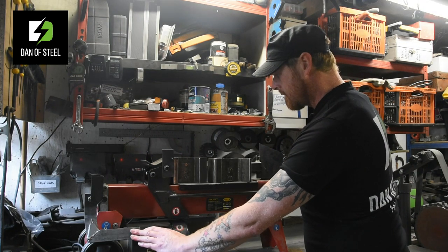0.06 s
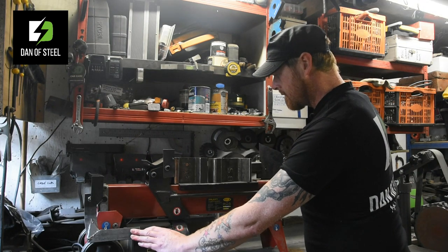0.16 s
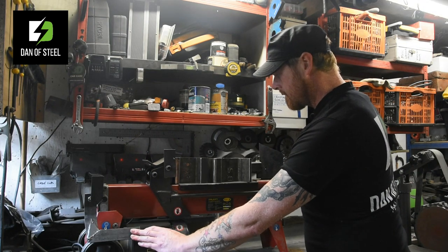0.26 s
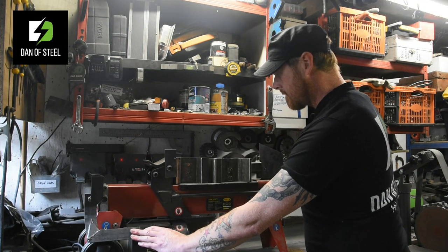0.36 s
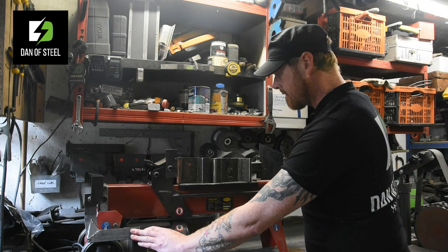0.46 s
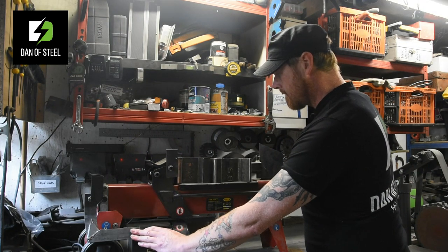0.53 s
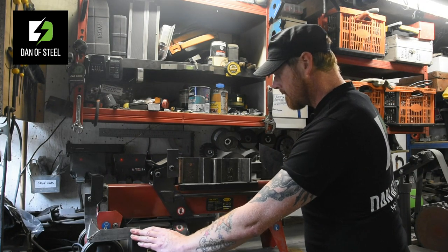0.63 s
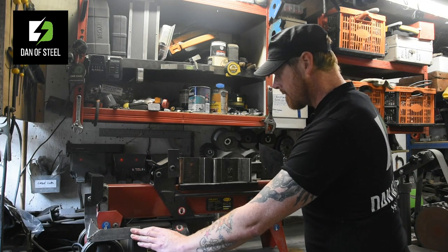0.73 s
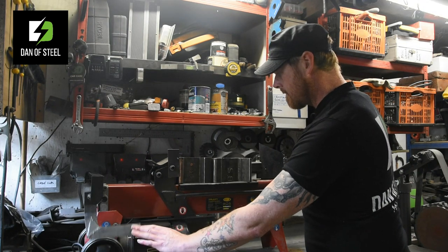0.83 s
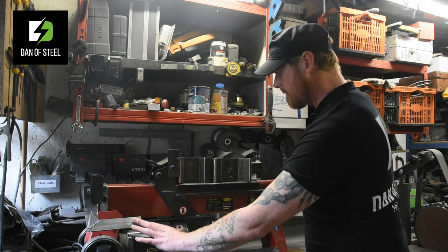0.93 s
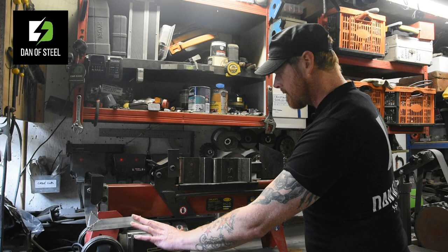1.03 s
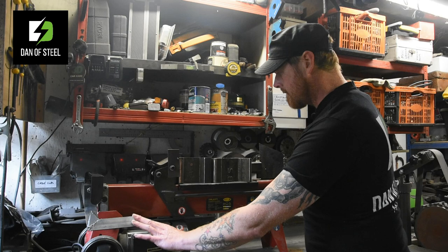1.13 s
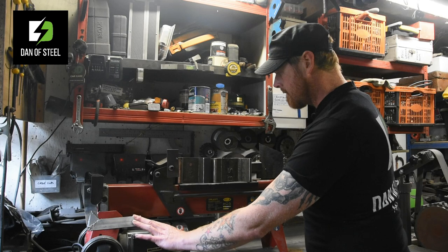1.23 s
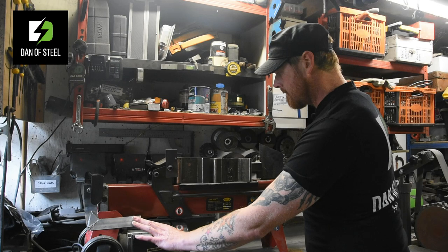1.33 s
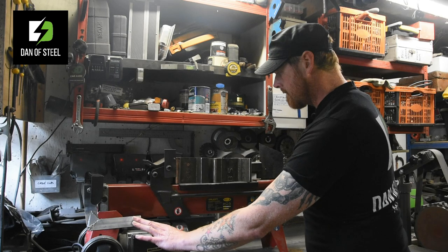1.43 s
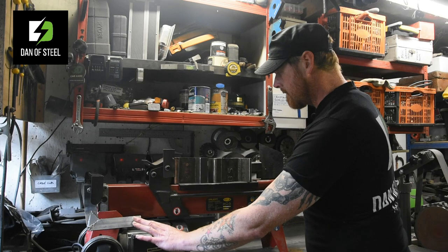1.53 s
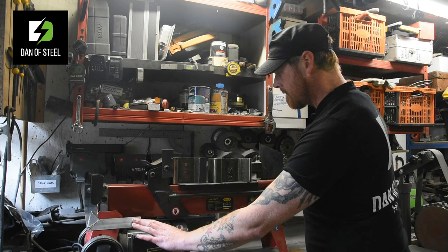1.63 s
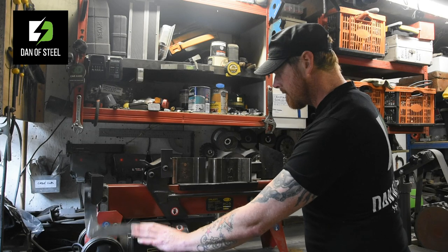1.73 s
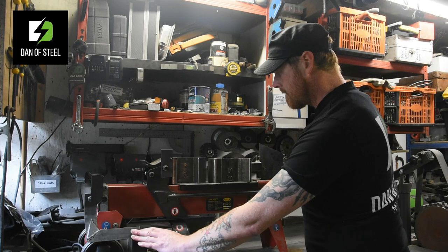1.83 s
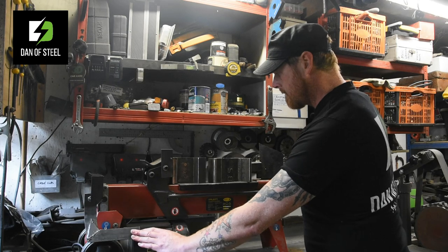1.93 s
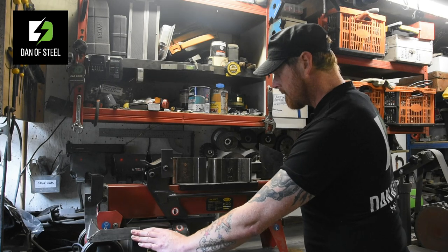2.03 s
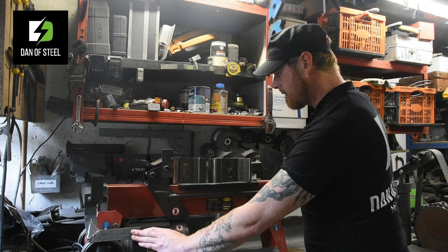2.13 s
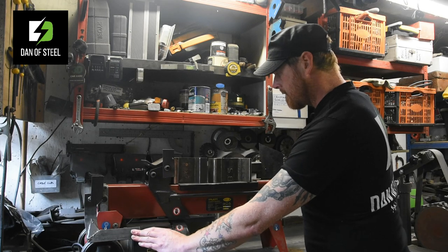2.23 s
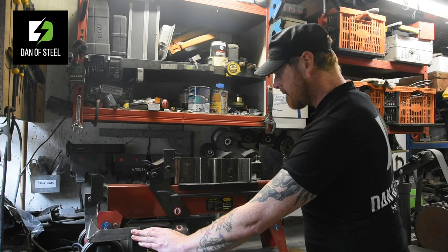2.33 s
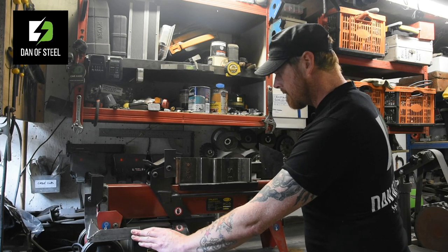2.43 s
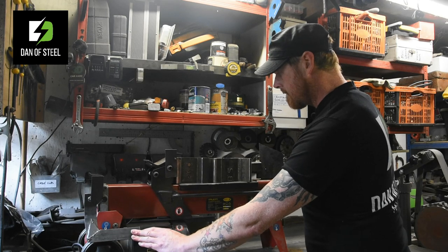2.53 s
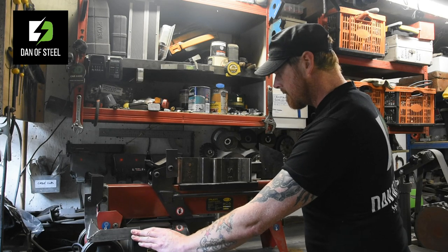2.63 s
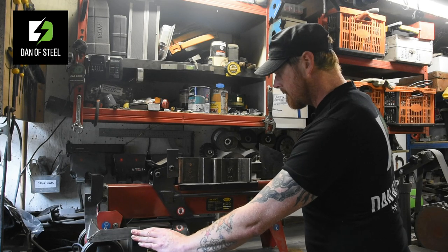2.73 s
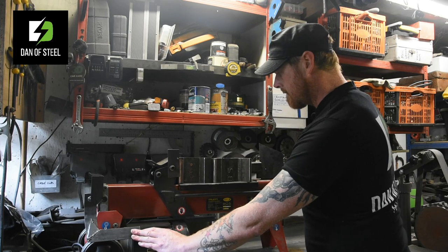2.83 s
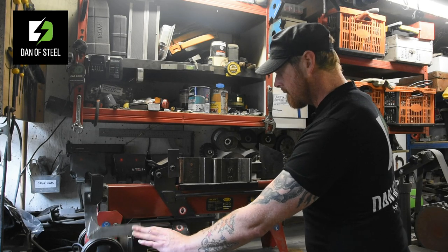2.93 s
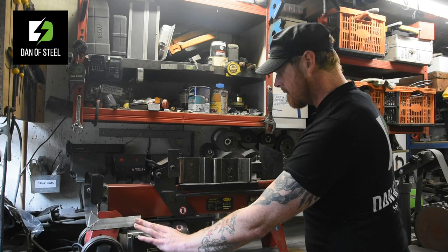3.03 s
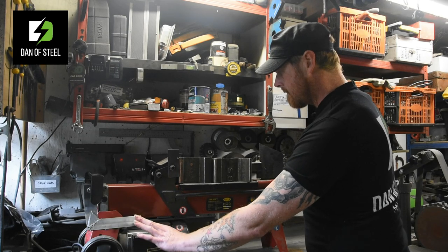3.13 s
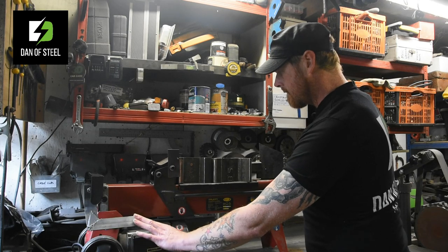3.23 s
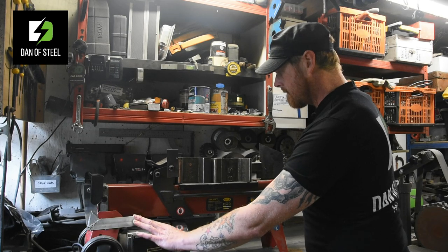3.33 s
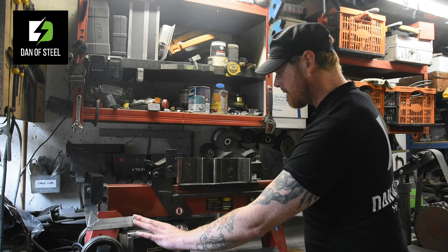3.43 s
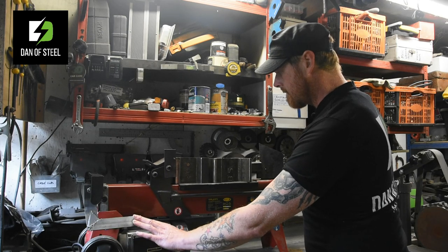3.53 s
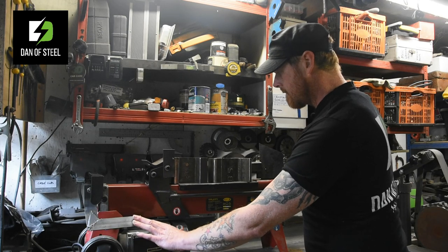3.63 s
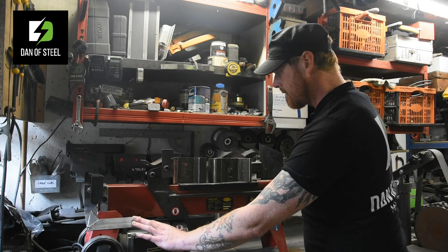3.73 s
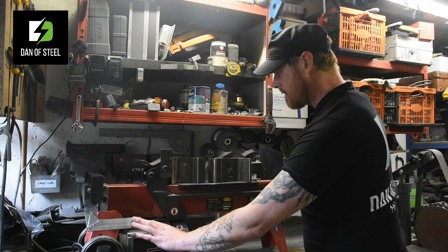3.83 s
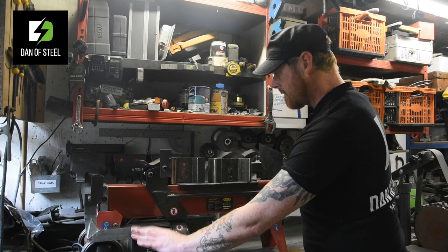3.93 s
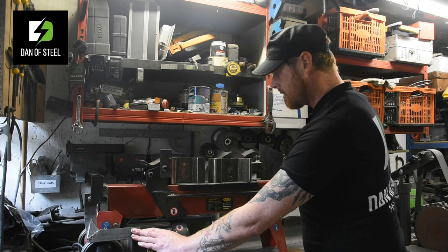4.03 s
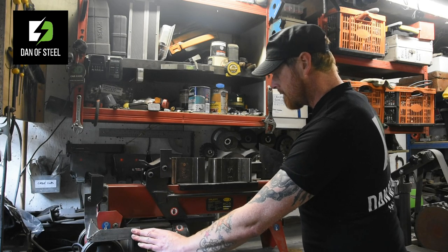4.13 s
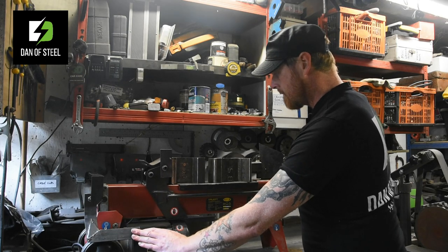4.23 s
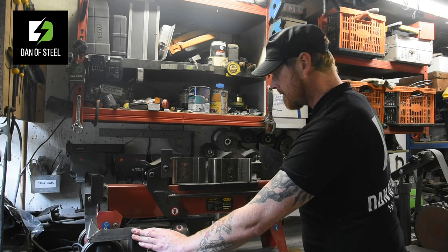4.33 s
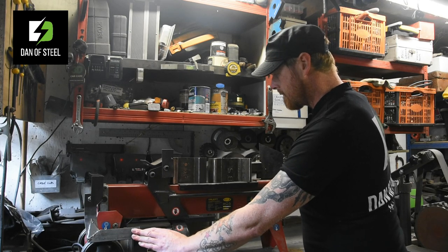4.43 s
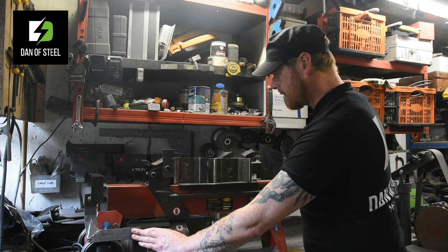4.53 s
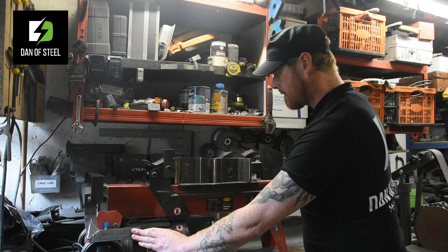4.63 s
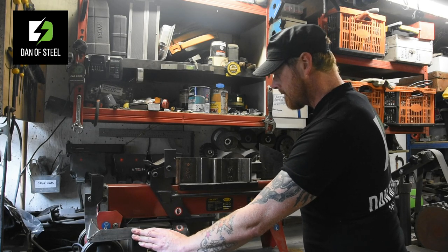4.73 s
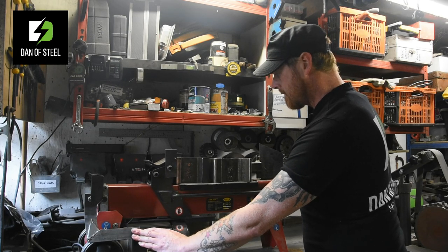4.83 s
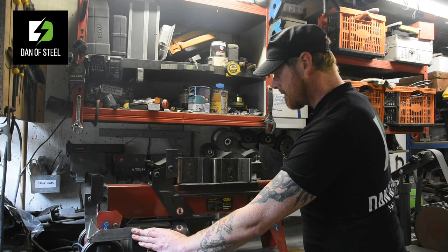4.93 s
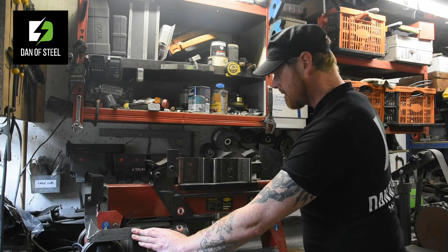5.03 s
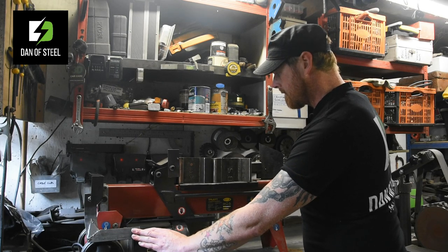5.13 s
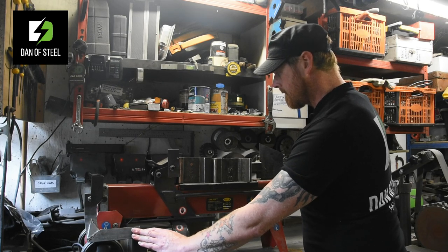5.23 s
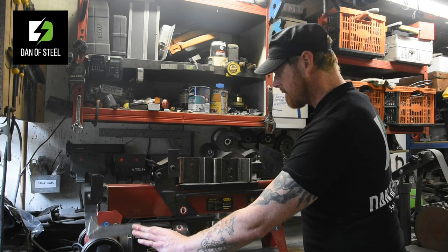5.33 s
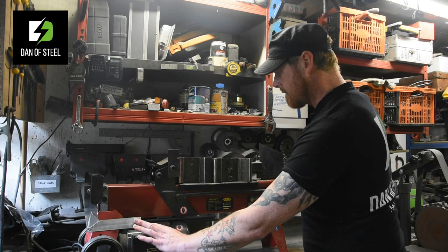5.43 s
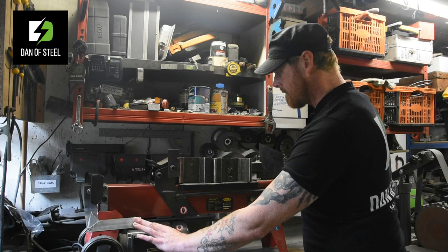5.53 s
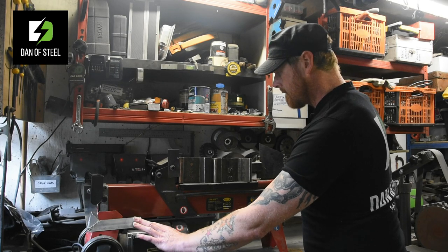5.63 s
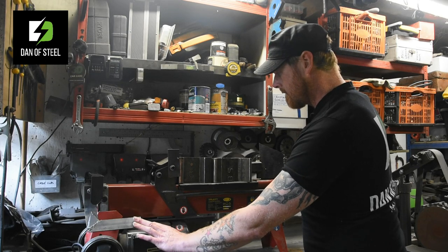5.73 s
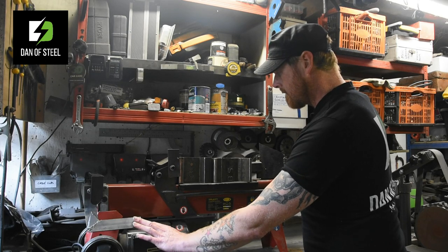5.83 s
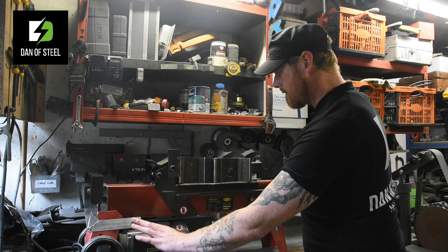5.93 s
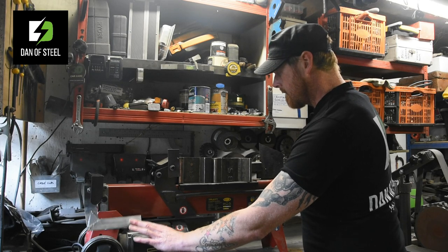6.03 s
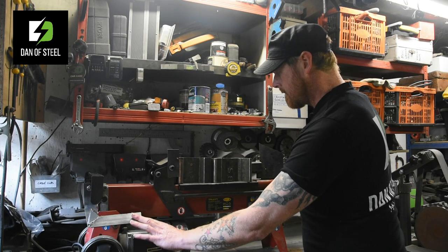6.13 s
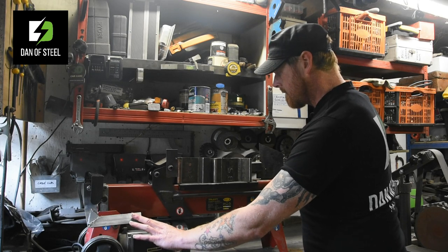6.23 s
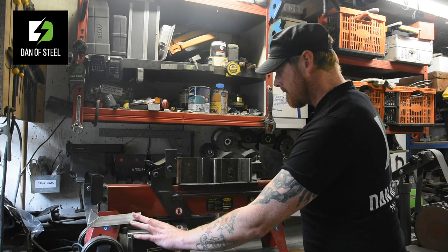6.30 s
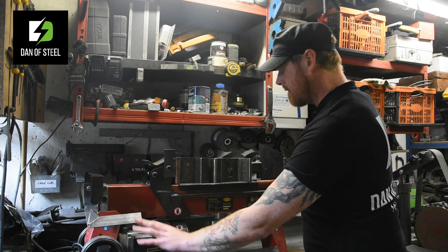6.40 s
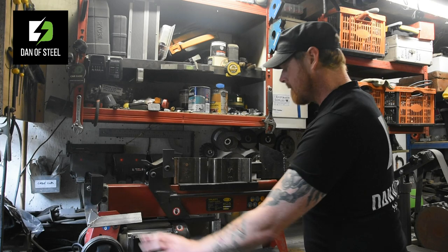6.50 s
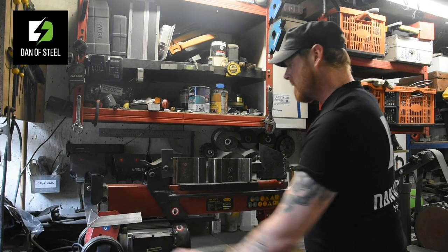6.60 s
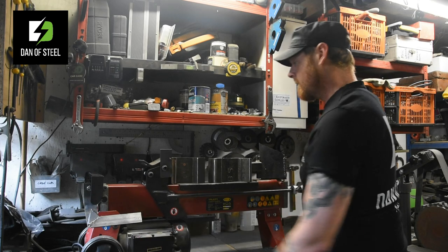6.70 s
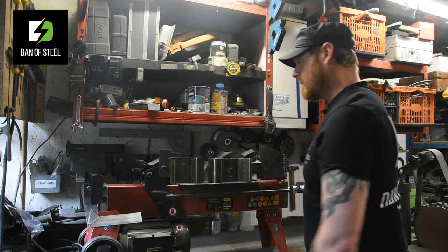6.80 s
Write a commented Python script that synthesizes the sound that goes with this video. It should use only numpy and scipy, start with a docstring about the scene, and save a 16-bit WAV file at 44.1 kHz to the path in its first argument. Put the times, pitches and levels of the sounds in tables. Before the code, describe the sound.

A close view of an electric hydraulic machine in a crowded workshop. It is already starting at 0 s: rapid steel knocks, a buzzing motor and a rough growl, then a loud gear whine with oil hiss and frame rattle, tightening under load until a knock at 0.8 s. Power drops at 0.9; the rotor brakes quickly and whirrs down, a rough bearing brushing once per turn over softly hissing return oil. Knocks and clicks come near 1.2, a squealing steel scrape at 1.85. The second run starts with knocks at 2.07, unloads at 2.9 and coasts, with a knock at 3.3 and a scrape at 4.0. The third runs from 4.26 to 5.4, with a knock at 5.2, then a longer slowing, ticking coast. At 6.1 a lever snaps back with a bright ringing crack and tiny squeaks; soft thuds, faint scrapes and clicks follow until about 6.75 as the whirr dies. Shelves return a short echo.

```python
"""Electric log splitter in a workshop

An induction motor runs an eleven-tooth gear pump three times, with tones locked to shaft and teeth.
Filtered noise gives the oil's hiss and the rattle; each run ends in a coast with a ticking bearing.
Decaying modes make the knocks of the steel frame and the lever snapping back near the end.
Sliding steel scrapes and squeals, and crowded shelves return a short echo of the blows."""
import sys
import numpy as np
from scipy import signal
from scipy.fft import rfft, irfft
from scipy.io import wavfile
from scipy.ndimage import uniform_filter1d

SR = 44100
rng = np.random.default_rng(int(sys.argv[2]) if len(sys.argv) > 2 else 0)


def wav_record(signal):
    """Record a signal, one row per channel, as 16-bit PCM in the file named by sys.argv[1]."""
    frames = np.transpose(np.atleast_2d(signal))
    bounded = np.clip(frames, -1, 1)
    # unit amplitude maps onto the largest positive 16-bit level
    quanta = np.round(bounded * 32767).astype(np.int16)
    wavfile.write(sys.argv[1], SR, quanta)


N = 302526
T = np.arange(N) / SR  # time [s]

# runs: (power on [s], pressure lets go [s], power off [s], return flow ends [s], shaft comes to rest [s],
#        hiss [dB], whine [dB], tooth ring [dB], start [dB], rattle [dB]), levels as offsets
RUNS = [(-.018, 0.798, 0.9, 1.73, 1.95, 0.8, 0.5, 2.5, 2.5, 1),
        (2.066, 2.918, 2.995, 3.88, 4.1, -2.1, 0.5, 0.5, -3, -1),
        (4.257, 5.215, 5.385, 5.45, 6.86, -0.7, 0.05, -0.5, -0.5, 0.5)]
# modes of the steel frame: (frequency [Hz], relative level [dB], t60 [s])
FRAME_MODES = [(503, -11, 0.21), (665, -1.5, 0.18), (774, 1.5, 0.29), (1140, -2.5, 0.34), (1306, 7, 0.12),
               (1470, 6, 0.11), (1580, -3, 0.067), (2034, 15.5, 0.038), (2100, -6, 0.066), (2814, -5, .06),
               (3174, 1.5, 0.077)]
TEETH, MAINS_HZ = 11, 50
# after power on the pump draws oil at PRIME_S; after power off it delivers until SPILL_S
PRIME_S, SPILL_S = 0.11, 0.066


def undb(db):
    """Level in decibels to amplitude ratio."""
    return 10 ** (np.asarray(db) / 20)


def unit(x):
    """Normalisation to an rms of 1."""
    return x / np.sqrt(np.mean(x ** 2))


def noise():
    """White noise: equal power density at all frequencies."""
    return rng.standard_normal(N)


def walk(rate):
    """Smoothed random steps, rate per second: a drift of rms 1."""
    step = int(SR / rate)
    steps = np.repeat(rng.standard_normal(N // step + 1), step)
    return unit(uniform_filter1d(steps, step)[:N])


def colour(x, points, peaks=()):
    """Minimum-phase filter of unit energy through (Hz, dB) points, plus (Hz, width Hz, dB) resonances."""
    size = 2 ** 12
    f = np.maximum(np.arange(size // 2 + 1) * SR / size, 1)
    hz, level = np.transpose(points)
    level = np.interp(np.log(f), np.log(hz), level)
    for centre, width, gain_db in peaks:
        level = level + gain_db / (1 + (2 * (f - centre) / width) ** 2)
    # folding the cepstrum onto positive time makes the response causal
    cepstrum = irfft(np.log(undb(level)))[:size // 2]
    cepstrum[1:] *= 2
    response = irfft(np.exp(rfft(cepstrum, size)))
    return signal.fftconvolve(x, response / np.linalg.norm(response))[:N]


def envelope(start, end, attack_s, release_s):
    """First-order charge and discharge: exponential approach from start, exponential release after end."""
    attack = 1 - np.exp(-np.maximum(T - start, 0) / attack_s)
    return attack * np.exp(-np.maximum(T - end, 0) / release_s)


def decay(s, t60):
    """Exponential damping after a jump at s, falling 60 dB in t60."""
    return (T >= s) * np.exp(-np.log(1000) * np.clip((T - s) / t60, 0, 2))


def impulses(rows):
    """Ideal impact: a force one sample long for each (s, dB) blow."""
    return sum(undb(db) * np.diff(T >= s, prepend=0) for s, db, *_ in rows)


def bursts(rows):
    """Random micro-impacts: a decaying shower of noise for each (s, dB, t60) blow."""
    return noise() * sum(undb(db) * decay(s, t60) for s, db, t60 in rows)


def ring(modes):
    """Modal superposition: impulse response of slightly mistuned damped modes, of unit energy."""
    t = T[:SR // 2]
    response = 0
    for hz, db, t60 in modes:
        mistuning = 1 + .002 * rng.standard_normal()
        response = response + undb(db - 60 * t / t60) * np.sin(2 * np.pi * hz * t * mistuning)
    return response / np.linalg.norm(response)


def tones(turns, orders, waver_db):
    """Order locking: sines at multiples of a rotation, each wavering in level."""
    total = 0
    for order, db in orders:
        level = undb(db + waver_db * walk(14))
        total = total + level * np.sin(2 * np.pi * (order * turns + rng.random()))
    return total


def surface(turns, locked, count):
    """Cyclic roughness that recurs every turn (power share locked), mixed with fresh turbulence."""
    bumps = np.interp(turns % 1 * count, np.arange(count), rng.standard_normal(count))
    return np.sqrt(locked) * unit(bumps) + np.sqrt(1 - locked) * noise()


def shaft_speed():
    """Rotor dynamics as a share of full speed: the motor spins up, oil brakes it at power off, it coasts."""
    coast_share, coast_s = .596, .83  # share of speed left after braking, time constant of coasting
    spin_up_s, brake_s, rest_s = .06, .09, .07
    speed = 0
    for on, _, off, _, rest, *_ in RUNS:
        idle = np.maximum(T - off, 0)
        braked = coast_share + (1 - coast_share) * np.exp(-(idle / brake_s) ** 3)
        coasting = np.exp(-idle / coast_s - np.maximum(T - rest, 0) / rest_s)
        speed = speed + np.tanh(np.maximum(T - on, 0) / spin_up_s) * braked * coasting
    return speed


def pressure(on, release, bleed_s=.015):
    """Hydraulic load of one run: oil pressure builds quickly, creeps up to about 1, then lets go."""
    rise_s, creep_db_per_s = 0.15, 3.5
    creep = undb(creep_db_per_s * np.minimum(T - release, 0))
    return envelope(on + PRIME_S, release, rise_s, bleed_s) * creep


def tone_load():
    """Slow unloading: the pressure of all runs as the tones follow it, bled off over 0.1 s."""
    return sum(pressure(on, release, bleed_s=.1) for on, release, *_ in RUNS)


def return_flow():
    """Displaced oil flows back from the end of delivery until the ram is home."""
    return sum(envelope(off + SPILL_S, home, 0.018, 0.098) for _, _, off, home, *_ in RUNS)


def shelf_echo(impacts):
    """Diffuse reflection: crowded shelves answer the blows with a short decaying noise response."""
    points = [(100, 7.5), (1000, -7.0), (5000, -2.0), (16000, -16)]
    shelves = colour(noise() * decay(0.004, 0.35), points)[:SR // 2]
    return undb(-12.5) * signal.fftconvolve(impacts, shelves / np.linalg.norm(shelves))[:N]


def swell(s, spread):
    """Gaussian rise and fall of a contact about its moment s."""
    return np.exp(-.5 * ((T - s) / spread) ** 2)


def squeal(hz, width):
    """Friction tone: a sine of rms 0.7 times root 2, its frequency jittering by the share width."""
    return np.sqrt(2) * np.sin(2 * np.pi * np.cumsum(hz * (1 + width * walk(900))) / SR)


def friction():
    """Stick-slip: sliding steel rings the frame and squeals; the lever spring squeaks."""
    # sliding steel, and the handle rattling in the 5260 Hz and 8300 Hz rows: (centre [s], spread [s], level
    # [dB], squeal [Hz], squeal relative to grit [dB])
    scrapes = [(1.842, 0.032, -26.5, 1319, -5), (4.023, 0.027, -23.5, 1316, -10.5),
               (6.605, 0.038, -42, 1620, 1.5), (6.62, 0.044, -47, 5260, 4), (6.52, 0.064, -49, 8300, -2),
               (6.644, 0.076, -45.5, 3280, -4)]
    # squeaks of the lever spring: (centre [s], spread [s], level [dB], frequency [Hz])
    squeaks = [(6.134, 0.0093, -20, 8660), (6.174, 0.015, -29, 4780), (6.168, 0.0097, -30.5, 9550)]
    # colour of the scrape: (frequency [Hz], relative density [dB])
    scrape_colour = [(100, -36), (250, -9.5), (470, -1.5), (900, -2), (1330, 6), (1650, -13), (2150, -5.5),
                     (2900, -8), (3600, -20), (9800, -17.5), (13500, -26), (16000, -40)]
    slips = unit(noise() * undb(2 * walk(250)))
    grit = undb(-3) * colour(slips, scrape_colour)
    grit = grit + undb(-12.5) * signal.fftconvolve(slips, ring(FRAME_MODES))[:N]
    total = 0
    for s, spread, db, hz, relative_db in scrapes:
        slide = grit + undb(relative_db) * squeal(hz, 0.0218)
        total = total + undb(db) * swell(s, spread) * slide
    for s, spread, db, hz in squeaks:
        total = total + undb(db) * swell(s, spread) * squeal(hz, 0.04)
    return total


def lever(s):
    """Impact excitation: the lever hits its stop with a bright crack, rings its modes and clatters out."""
    # modes of the lever: (frequency [Hz], relative level [dB], t60 [s])
    lever_modes = [(642, 8, 0.19), (580, -3, 0.15), (780, -7, 0.24), (1173, -7, 0.3), (1270, -13, 0.11),
                   (5130, -18, 0.24), (8695, -12, .09), (9000, -12, .09), (9700, -7, .06), (9500, 7, .06)]
    # colour of the clatter: (frequency [Hz], relative density [dB])
    clatter_colour = [(29, -64), (50, -16), (96, -17), (160, -15.5), (240, -27), (340, -13.5), (532, -8.5),
                      (645, -19), (727, -12), (2100, -14.5), (3840, -28.5), (6860, -29), (8730, -32),
                      (11400, -40), (14800, -35), (16000, -46)]
    crack_colour = [(1000, -19), (7000, -2.5), (10100, 6.5), (12000, -5), (16000, -2)]
    crack = colour(bursts([(s, -4, .04)]), crack_colour, [(10277, 500, 7.3)])
    clatter = colour(bursts([(s, -11, .13)]), clatter_colour)
    return crack + clatter + signal.fftconvolve(impulses([(s, 15)]), ring(lever_modes))[:N]


def blows():
    """Modal response to impact: knocks ring the frame and loose parts, clicks stay bright, thuds rock the stand."""
    # knocks of the frame: (time [s], level [dB], t60 [s])
    knocks = [(.039, -3, 0.023), (.079, -10, 0.05), (.12, -9.5, .03), (.138, -6, 0.054), (.803, -4, 0.055),
              (.812, -14, .06), (.969, -19, 0.062), (1.197, -6.5, 0.076), (1.314, -29, 0.076),
              (2.001, -38, 0.15), (2.083, -4.5, 0.055), (2.1, -5, 0.049), (2.145, -10, 0.025),
              (2.918, -9, 0.069), (3.065, -15, 0.048), (3.295, -12.5, 0.067), (3.413, -31, 0.086),
              (4.277, -9.5, 0.075), (4.288, -2, 0.037), (4.325, -9, 0.03), (4.342, -12, 0.032),
              (5.219, -7, 0.075), (6.696, -30, 0.067)]
    # light metal clicks of valve and handle: (time [s], level [dB], t60 [s])
    clicks = [(.97, -20.5, 0.033), (1.178, -17.5, 0.12), (1.225, -22, 0.035), (1.314, -24.5, 0.053),
              (1.866, -30, .04), (3.282, -20.5, 0.16), (3.413, -24.5, .04), (4.057, -33, 0.032),
              (4.091, -28.5, 0.018), (6.259, -34, 0.055), (6.323, -33, 0.044), (6.556, -26.5, 0.07),
              (6.615, -37, 0.29), (6.696, -28, 0.028), (6.737, -36, 0.038)]
    # soft thuds as the machine settles: (time [s], level [dB])
    thuds = [(1.209, -39), (1.47, -36), (3.32, -34), (6.124, -36), (6.325, -34), (6.409, -30), (6.508, -31)]
    # colours of loose parts and of clicks: (frequency [Hz], relative density [dB])
    knock_colour = [(35, -71), (60, -59), (491, -9.5), (731, 1), (1410, 2), (2040, -12), (2400, -7.5),
                    (3040, -9.5), (3930, -27.5), (6120, -19.5), (7550, -47), (10700, -33), (16000, -51)]
    click_colour = [(300, 1), (1300, 5.5), (2500, 5.5), (4000, -3.5), (5500, 6), (7500, 0.5), (10000, 3),
                    (12500, -6.5), (16000, -25)]
    chatter = bursts(knocks)
    push = undb(16.5) * impulses(knocks) + undb(-9.5) * chatter
    frame = signal.fftconvolve(push, ring(FRAME_MODES))[:N]
    loose_parts = undb(-1.5) * colour(chatter, knock_colour)
    bright = colour(bursts(clicks), click_colour)
    stand_modes = [(117.4, -4, 0.26), (154, -2, 0.069)]
    stand = undb(20.5) * signal.fftconvolve(impulses(thuds), ring(stand_modes))[:N]
    return frame + loose_parts + bright + stand


def bearing(turns, speed):
    """Periodic contact: a rough spot brushes past once a turn, unevenly, and fades as the shaft slows."""
    # one moment in each run at which the rough spot passes: (time [s])
    ticks_s = [1.606, 3.616, 5.906]
    points = [(1000, -8), (2700, -1), (4500, -6), (6000, 7.5), (7500, 7.5), (10500, 4), (15000, -12)]
    run = np.searchsorted([on for on, *_ in RUNS], T).clip(1) - 1
    angle = (turns - np.interp(ticks_s, T, turns)[run] + 0.023) % 1  # turns since the spot passed
    brush = np.exp(-angle / .12) - np.exp(-angle / .03)
    force = undb(-26.5 + 1.3 * walk(11)) * np.minimum(speed / 0.49, 1) ** 1.3
    return colour(noise() * brush, points) * force


def valve(teeth):
    """Resonance: tooth tones sliding past the valve's two resonances ring it while oil flows back."""
    # resonances of the valve: (frequency [Hz], width [Hz], gain [dB])
    valve_peaks = [(2760, 100, 20.7), (1170, 70, 20)]
    points = [(400, -12), (1000, 0), (3000, -8), (5000, -16)]
    drive = undb(-9) * (teeth + noise())
    return undb(-42) * colour(drive, points, valve_peaks) * return_flow()


def whirr(turns, speed, teeth):
    """Rolling contact through fixed housing resonances; level follows a power of shaft speed."""
    # colour of rolling: (frequency [Hz], relative density [dB])
    rolling_colour = [(28, -39), (48, -6), (75, -11), (118, -9), (200, -12.5), (400, -12), (520, -10.5),
                      (1400, -9), (2250, -8.5), (3000, -18.5), (4400, -20.5), (7000, -18.5), (10400, -23.5),
                      (15000, -36)]
    # resonances of the pump housing: (frequency [Hz], width [Hz], gain [dB])
    housing_peaks = [(533, 21, 6), (1167, 76, 10), (2207, 84, 8.5), (5980, 540, 10), (10650, 890, 7)]
    rolling = surface(turns, locked=0.34, count=2400) * undb(1.8 * walk(150))
    rolling = rolling + undb(-12.5) * teeth
    return colour(rolling, rolling_colour, housing_peaks) * undb(-30) * speed ** 0.72


def groan(turns):
    """Torque modulation: labouring gears growl in the frame, pulsing at twice the mains frequency."""
    # colour of the growl: (frequency [Hz], relative density [dB])
    growl_colour = [(80, -28), (300, -14), (430, -6), (520, 6), (680, -0.5), (900, -4.5), (1500, -5.5),
                    (2200, -17), (4000, -37)]
    effort = 0
    for on, *_, start_db, _ in RUNS:
        effort = effort + undb(start_db) * envelope(on + 0.028, on + 0.12, 0.039, 0.029)
    pulse = unit(1 + .5 * np.cos(2 * np.pi * 2 * MAINS_HZ * T))
    growl = surface(turns, locked=0.41, count=500) * pulse
    return undb(-17) * effort * colour(growl, growl_colour)


def rattle(turns, speed):
    """Structure-borne noise: the gears shake the frame, harder at start, under load and while braking."""
    # colour of the rattle: (frequency [Hz], relative density [dB])
    rattle_colour = [(30, -49), (70, -30), (130, -16), (220, -7.5), (370, -5.5), (520, 1), (850, 3),
                     (1200, 0.5), (1650, -1), (2100, -9), (2800, -15.5), (4000, -41), (6000, -47.5)]
    free_db, load_db, start_db, brake_db = -26, -24.5, -22.5, -27.5
    shaking = undb(free_db) * speed ** 2.33
    for on, release, off, *_, rattle_db in RUNS:
        starting = envelope(on + 0.02, on + 0.11, .06, 0.036)
        loaded = envelope(on + PRIME_S, release, 0.006, 0.0046)
        braking = envelope(off - .025, off + .07, 0.051, 0.042)
        load = .65 * pressure(on, release) + .3 * loaded
        shaking = shaking + undb(start_db) * starting
        shaking = shaking + undb(rattle_db) * (undb(load_db) * load + undb(brake_db) * braking)
    wobble = unit(undb(0.59 * walk(110)))
    return colour(surface(turns, locked=0.12, count=700) * wobble, rattle_colour) * shaking


def oil(turns, speed):
    """Flow noise: turbulent oil hisses, squirting once a tooth, and sizzles past worn teeth."""
    # colours of hiss and sizzle: (frequency [Hz], relative density [dB])
    hiss_colour = [(1500, -3), (2900, 3), (3400, 1.5), (4400, -4), (5300, -2), (7100, -0.5), (8700, -7.5),
                   (10300, 2), (11700, -15), (13400, -15), (14400, -17), (16000, -20)]
    sizzle_colour = [(3000, -16.5), (5000, -16), (5600, -2), (7100, 5.5), (7850, 4), (8500, -2.5),
                     (9900, -1), (11600, -0.5), (13400, -19), (14400, -8), (15000, -21), (16000, -17)]
    free_db, load_db, brake_db, return_db, coast_db = -31.5, -31.5, -35, -39.5, -44  # relative levels
    flow = undb(coast_db) * speed ** 2.1 + undb(return_db) * return_flow()
    for on, release, off, _, _, hiss_db, *_ in RUNS:
        pumping = envelope(on + PRIME_S, off + SPILL_S, 0.006, 0.025)
        loaded = envelope(on + PRIME_S, release, 0.006, 0.0046)
        braking = envelope(off - .025, off + .07, 0.051, 0.042)
        flow = flow + undb(hiss_db) * (undb(free_db) * pumping + undb(load_db) * loaded)
        flow = flow + undb(brake_db) * braking
    squirt = unit(1 + 0.32 * np.cos(2 * np.pi * TEETH * turns))
    hiss = colour(noise() * squirt, hiss_colour)
    sizzle = colour(surface(turns, locked=0.82, count=887), sizzle_colour)
    return undb(-2.5) * (hiss + sizzle) * flow


def motor(turns):
    """Electromagnetic force: the motor buzzes at mains harmonics, then sings at multiples of shaft rate."""
    # buzz of the starting current: (multiple of mains frequency, relative level [dB])
    buzz_orders = [(10, -5.5), (11, -4), (13, -5.5), (15, -4), (23, -1), (24, -7.5), (32, -18)]
    # motor tones and hum: (multiple of shaft rate, relative level [dB])
    slot_orders = [(13, -24), (15, -11), (20, -12), (21, -33), (23, 0), (24, 2.5), (25, -11), (26, -6.5),
                   (29, -26)]
    hum_orders = [(1, -2.5), (2, -4), (3, -8), (4, -13), (6, -7)]
    inrush_s = 0.18  # the starting current flows this long
    load = tone_load()
    buzz, slots, hum = 0, undb(-30.5) * load, undb(-39.5) * load
    for on, _, off, *_ in RUNS:
        buzz = buzz + undb(-19) * envelope(on, on + PRIME_S, .055, .04)
        slots = slots + undb(-28) * envelope(on + PRIME_S, off, 0.086, 0.028)
        slots = slots + undb(-19.5) * envelope(on + 0.067, on + inrush_s, 0.034, 0.013)
        hum = hum + undb(-40.5) * envelope(on, off + SPILL_S, 0.086, 0.077)
    buzzing = buzz * tones(MAINS_HZ * T, buzz_orders, waver_db=5.0)
    singing = slots * tones(turns + 0.00077 * walk(40), slot_orders, waver_db=2.0)
    return buzzing + singing + hum * tones(turns, hum_orders, waver_db=1.6)


def pump_whine(turns):
    """Gear meshing: harmonics of the tooth rate, raised by load, their phase rippled by motor torque."""
    # pump tones: (multiple of tooth rate, relative level [dB], added by full pressure [dB])
    gear_orders = [(1, -3.5, 4), (2, -1, 3.5), (3, -4, 7), (4, 2, 6.5), (5, -7, 12.5)]
    # ring of the meeting teeth: (multiple of tooth rate, relative level [dB])
    mesh_orders = [(6, 0.5), (7, -4.5), (8, -14), (9, -11.5), (10, -4), (11, -10), (12, -4), (13, 1),
                   (14, -10), (15, -6), (17, -15), (18, -12), (19, -15), (20, -14), (21, -21), (26, -22)]
    # teeth ringing out as the pump takes up the oil: (multiple of tooth rate, level [dB])
    flare_orders = [(3, -30), (6, -27), (7, -38)]
    whine_level_db, tooth_free_db, tooth_load_db = -28, -37.5, -32
    gear = tooth = flare = 0
    for on, release, off, _, _, _, whine_db, tooth_db, *_ in RUNS:
        start = on + PRIME_S
        gear = gear + undb(whine_level_db + whine_db) * envelope(start, off, 0.071, 0.051)
        meeting = undb(tooth_free_db) * envelope(start, off, 0.086, 0.028)
        meeting = meeting + undb(tooth_load_db) * envelope(start, release, 0.024, .01)
        tooth = tooth + undb(tooth_db) * meeting
        flare = flare + undb(tooth_db) * envelope(start, on + .25, .06, .06)
    mesh = TEETH * turns + 0.0037 * walk(120)
    ripple = .012 * np.sin(2 * np.pi * 2 * MAINS_HZ * T)
    load = tone_load()
    loaded_orders = [(order, db + rise_db * load) for order, db, rise_db in gear_orders]
    whine = gear * tones(mesh, loaded_orders, waver_db=1.55)
    meshing = tooth * tones(mesh + ripple, mesh_orders, waver_db=1.2)
    return whine + meshing + flare * tones(mesh + .03 * walk(90), flare_orders, waver_db=2.5)


def scene():
    """Superposition: one shaft rotation drives the running sounds; blows, friction and echo add to them."""
    speed = shaft_speed()
    full_speed = 49.7  # turns per second
    turns = np.cumsum(full_speed * speed * (1 + .0003 * walk(12))) / SR
    teeth = unit(tones(TEETH * turns, [(order, 0) for order in range(2, 24)], waver_db=4))
    impacts = blows() + lever(6.1128)
    running = bearing(turns, speed) + valve(teeth) + whirr(turns, speed, teeth) + groan(turns)
    running = running + rattle(turns, speed) + oil(turns, speed) + motor(turns) + pump_whine(turns)
    return (shelf_echo(impacts) + friction() + impacts + running)[None]


def record(dry):
    """Soft saturation rounds off the highest peaks; an elliptic low-pass cuts the top."""
    top_hz = 15900
    rounded = dry / (1 + dry ** 6) ** (1 / 6)
    return signal.sosfilt(signal.ellip(10, .2, 80, top_hz, fs=SR, output="sos"), rounded)


dry = scene()
out = record(dry)
wav_record(out)
```